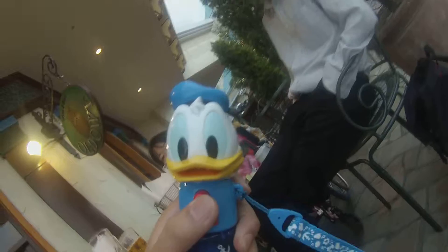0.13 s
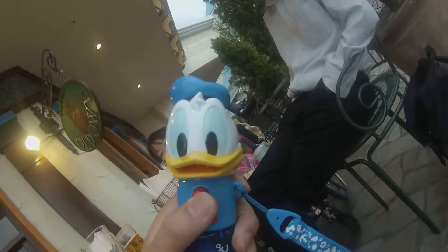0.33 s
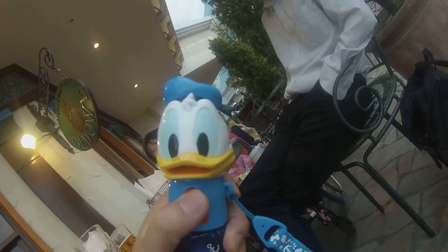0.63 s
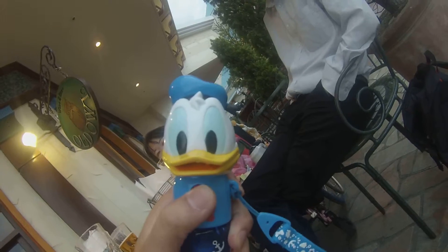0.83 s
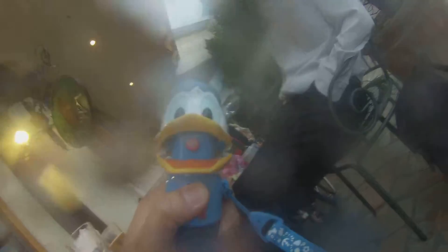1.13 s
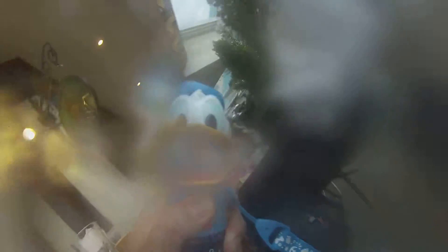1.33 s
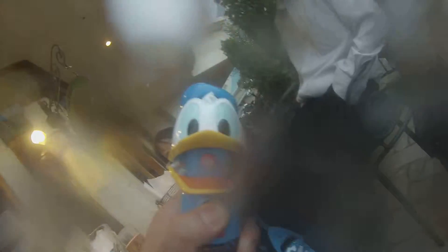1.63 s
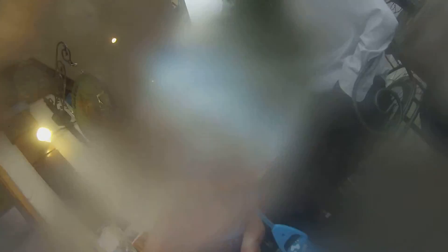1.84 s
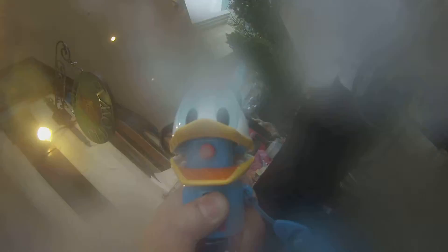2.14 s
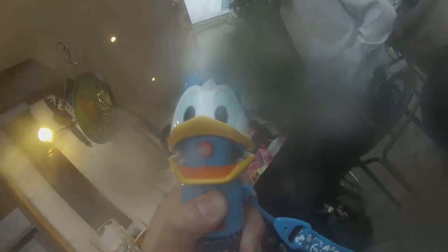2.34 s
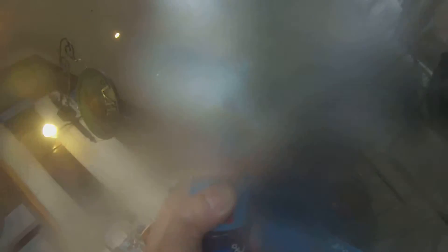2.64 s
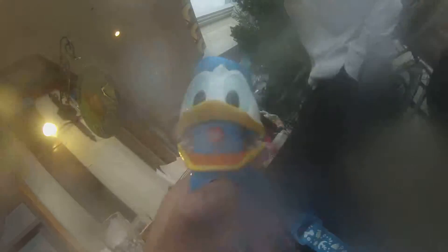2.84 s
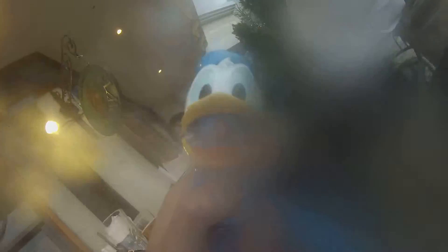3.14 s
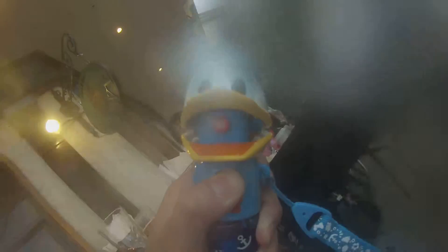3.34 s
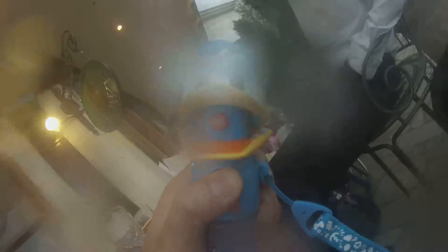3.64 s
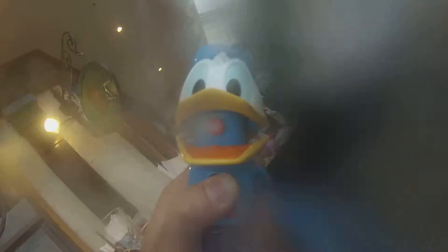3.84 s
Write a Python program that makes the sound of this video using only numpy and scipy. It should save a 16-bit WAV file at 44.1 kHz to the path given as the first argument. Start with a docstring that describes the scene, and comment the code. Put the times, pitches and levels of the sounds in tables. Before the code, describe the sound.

Water jet from a plastic toy spatters loudly on a camera housing after knocks and clicks

```python
"""A hand rubs, pushes and knocks a camera's housing outdoors, then a plastic toy water gun creaks when pressed.
Its valve clicks and a steady jet lands on the camera, brightest while it hits squarely, then an even spatter.
Rubbing, hiss and air are coloured noise; knocks, ticks and large drops are short bursts with dying rings.
The jet is thousands of random tiny impacts a second, which drum, spatter, sizzle and ring on the shell."""
import sys
import numpy as np
from scipy import signal
from scipy.fft import rfft, irfft
from scipy.io import wavfile

SR = 44100
rng = np.random.default_rng(int(sys.argv[2]) if len(sys.argv) > 2 else 0)


def file_out(sig):
    """Save sig as 16-bit WAV at sys.argv[1]."""
    # one column per channel
    cols = np.atleast_2d(sig).T
    # limit, then scale
    lim = np.clip(cols, -1, 1)
    pcm = np.round(lim * 32767).astype(np.int16)
    wavfile.write(sys.argv[1], SR, pcm)


N = 176400  # length in samples: 4 s
TIME = np.arange(N) / SR  # seconds

# Colour tables give relative levels: each sound is brought to a standard strength before its own level.
# Rubbing hand, strength over time [t/s, level/dB] and colour [f/Hz, level/dB]
RUBBING_LEVEL = [(.069, -45), (.075, -41.5), (.11, -43.5), (.16, -41.5), (.177, -27.5), (.186, -41.5),
                 (.192, -55), (.23, -79)]
RUBBING_COLOUR = [(100, -3), (450, -3), (900, -2), (1550, 3.5), (2200, -3), (3650, 0), (4500, -8),
                  (6000, -18), (9000, -17), (12000, -26.5), (15000, -31)]
# Low hum of the pressing hand, strength [t/s, level/dB] and colour [f/Hz, level/dB]
GRIP_HUM_LEVEL = [(.2, -62), (.3, -71), (.55, -62), (.63, -49), (.76, -58), (.85, -67), (.95, -69),
                  (1.1, -80)]
GRIP_HUM_COLOUR = [(40, -12), (110, 3.5), (200, -5), (300, -8), (420, -25), (1000, -47), (4000, -72)]
# Faint outdoor wash, colour [f/Hz, level/dB]
WASH_COLOUR = [(150, -6), (300, -10), (600, -11.5), (1100, -19), (1800, -19), (2600, -25), (3400, -25),
               (4300, -25), (8000, -37.5), (15000, -41)]
# Low rumble of air, strength [t/s, level/dB] and colour [f/Hz, level/dB]
AIR_RUMBLE_LEVEL = [(.06, -60), (.1, -25.5), (.3, -45), (.65, -42.5), (1.0, -48.5), (1.11, -39.5),
                    (1.25, -44.5), (1.35, -41), (1.55, -47.5), (2.0, -49), (2.08, -43), (2.35, -44),
                    (2.55, -49), (4.0, -50)]
AIR_RUMBLE_COLOUR = [(10, 1), (30, 10), (55, -1.5), (85, -7.5), (130, -16), (250, -34.5), (600, -50),
                     (2000, -73.5)]
# Soft pushes of the hand [middle t/s, length/s, peak pressure as signal value]
HAND_PUSHES = [(.0975, 0.005, -0.096), (0.1286, 0.01, 0.22), (0.1495, 0.0029, .22), (.1525, 0.0026, 0.13),
               (.158, .009, -0.11), (.175, 0.036, 0.098), (.197, 0.035, -0.085)]
# Knocks on the housing [t/s, level/dB, ring level/dB, treble corner f/Hz]
HOUSING_KNOCKS = [(.125, 6.5, -14, 4500), (0.1462, -22, -8, 5000), (.1535, 8, -7, 15000),
                  (.1601, 4, 0, 3800), (.1654, -10, -2, 12000)]
# Colour of a knock [f/Hz, level/dB]
KNOCK_COLOUR = [(60, -5), (400, -7.5), (620, -1.5), (900, -4.5), (1450, -1.5), (2150, -10), (3000, -4),
                (3800, -4.5), (4600, -1), (5400, -10.5), (6300, -16), (7900, -6), (8900, -10.5),
                (9800, -10), (11500, -17), (13000, -21), (14200, -33), (15500, -42)]
# Ringing tones of the housing [f/Hz, level/dB, time to fall 60 dB/s]
HOUSING_TONES = [(1516, -24, 0.058), (1680, -22.5, 0.043), (3060, -27, 0.01), (3700, -30, .012),
                 (4600, -25, 0.0092)]
# Stick-slip ticks of the plastic [t/s, level/dB, treble corner f/Hz, f/Hz of the spot that rings]
PLASTIC_TICKS = [(0.2517, -27.5, 2000, 1100), (.2595, -30, 4000, 2200), (0.2846, -15.5, 1700, 1240),
                 (0.3076, -23, 4000, 2400), (0.3522, -20.5, 6000, 2530), (0.3795, -28, 1800, 1900),
                 (0.4001, -22, 6000, 2650), (0.4516, -23, 6000, 2690), (.4975, -26, 3020, 1190),
                 (0.503, -22.5, 4500, 2650), (0.5477, -22, 4030, 2580), (.5755, -24, 1500, 1000),
                 (0.6244, -17, 7000, 3600), (0.6559, -20, 5000, 2950), (0.693, -19, 4500, 2900),
                 (.7265, -19, 5000, 2950), (0.7568, -21.5, 4000, 2300), (0.7892, -22, 3500, 1250),
                 (0.8223, -22, 3500, 1300), (0.8569, -23.5, 2800, 1400), (0.8924, -21.5, 2800, 1400)]
# Colour of a tick [f/Hz, level/dB]
TICK_COLOUR = [(50, 13.5), (130, 13.5), (260, 7.5), (400, -2), (700, 1), (1250, 1), (1650, -2), (2900, -2),
               (4000, -10.5), (5200, -10), (7000, -13), (9000, -18), (15000, -22)]
# Thin hiss, swelling until the jet [t/s, level/dB], and its colour [f/Hz, level/dB]
THIN_HISS_LEVEL = [(.1, -102), (.5, -68.5), (.8, -66), (.85, -67), (.89, -58), (.94, -65), (1.04, -66.5),
                   (1.08, -52.5)]
THIN_HISS_COLOUR = [(300, -15.5), (1100, -3), (1500, 1.5), (2200, -9), (3000, -6), (3400, 2), (3900, -12),
                    (6000, -12), (9000, -16), (15000, -29)]
# Ringing tones of the valve [f/Hz, relative level/dB, time to fall 60 dB/s]
VALVE_TONES = [(1610, -6, .025), (2400, -8, .008), (2950, -4, .016), (3600, 1, .009), (4550, -3, 0.0099),
               (6400, -3, .006), (7300, -16, .006), (12000, -20, .004)]
# Spatter, strength [t/s, level/dB] and colour [f/Hz, level/dB]
SPATTER_LEVEL = [(1.08, -36), (1.097, -32.5), (1.125, -37), (1.19, -33.5), (1.3, -32), (1.5, -34.5),
                 (1.8, -33), (2.05, -32), (2.3, -32.5), (2.8, -33.5), (2.9, -32.5), (3.15, -31.5),
                 (3.45, -32), (3.65, -31.5), (3.85, -34.5), (4.0, -32.5)]
SPATTER_COLOUR = [(300, -31), (800, -15), (1550, -4.5), (2000, -7), (2550, -7), (3100, 0), (3900, -1.5),
                  (4540, 2.5), (5000, -7), (5620, -4), (6400, -9), (7300, -10), (8200, -6), (9050, -3.5),
                  (10000, -13), (11200, -8.5), (12100, -14), (13300, -7.5), (14300, -29), (15200, -19)]
# Bright sizzle where the jet hits squarely, strength [t/s, level/dB] and colour [f/Hz, level/dB]
SIZZLE_LEVEL = [(1.08, -35.5), (1.17, -39), (1.26, -30), (1.34, -27), (1.5, -25), (1.68, -27), (1.87, -29),
                (2.0, -40), (2.25, -40), (2.6, -58), (4.0, -55)]
SIZZLE_COLOUR = [(300, -42), (1200, -8.5), (2300, -7.5), (2900, -8), (3450, -1.5), (3900, -3), (4500, 5.5),
                 (5050, -6), (6500, -8), (7300, -11), (8500, -9.5), (11000, -13.5), (13200, -17),
                 (14300, -29), (15200, -24)]
# Dull drumming of heavier water, strength [t/s, level/dB] and colour [f/Hz, level/dB]
DRUMMING_LEVEL = [(1.08, -38), (1.13, -47), (1.22, -43), (1.35, -39.5), (1.55, -38), (2.0, -38.5),
                  (2.4, -40), (2.8, -38), (3.2, -37), (3.65, -36.5), (4.0, -38.5)]
DRUMMING_COLOUR = [(120, -19), (300, -13), (600, -9), (850, -2), (1200, 0.5), (1800, -4.5), (2300, 2),
                   (2800, -4), (3800, -9), (6000, -19.5), (12000, -45)]
# Two rings of the wet shell, strength of each [t/s, level/dB]
LOWER_RING_LEVEL = [(1.08, -51), (1.2, -45), (1.35, -32), (1.52, -31.5), (1.7, -40), (1.9, -36), (2.2, -54),
                    (2.8, -42), (3.0, -36), (3.4, -43), (4.0, -65)]
HIGHER_RING_LEVEL = [(1.08, -67), (1.45, -37), (1.7, -32.5), (1.9, -34), (2.15, -40), (2.5, -46),
                     (2.8, -48), (4.0, -58)]
# Single large drops [t/s, level/dB, ring level/dB, share of bright spit 0-1]
LARGE_DROPS = [(1.0787, -14, -12, 0), (1.0882, -9, 7, 0.3), (1.0965, -10.5, 0, .1), (1.1175, -9, -22, 0.5),
               (1.317, -6, -5, 0), (1.4915, -3, -11, 0.1), (1.496, -10, 4, .2), (1.6495, -11, -9, 0.4),
               (1.832, -9, -12, .6), (2.458, -11, -15, 0.8), (2.4862, -9, -15, 1), (2.503, -5.5, -25, 1),
               (3.1598, -18, -8, 0.6)]
# Colour of the bright spit [f/Hz, level/dB]
SPIT_COLOUR = [(500, -28), (3000, -21), (6500, -8), (8800, 0), (10500, -9), (13200, -2), (15300, -4)]
# Soft low bumps on the microphone under the jet [middle t/s, length/s, peak pressure as signal value]
JET_BUMPS = [(1.087, .018, -.022), (1.122, .04, .026), (2.486, .022, .018)]

START_S = RUBBING_LEVEL[0][0]  # hand and air are silent before this
WASH_DB = -61
SPOT_DB, SPOT_T60_S = -30, 0.016  # ring of a ticking spot; T60 = time to fall 60 dB
VALVE_S, VALVE_DB = 1.0442, -23
JET_S, JET_RISE_S = 1.077, 0.0035
DROPS_PER_S = 6000  # average, in each layer of water
DROP_SPREAD_DB, DROP_LIMIT = 5, 2.55  # drop size varies; the largest stop at 2.55 spreads
SPOT_SMEAR_S = .0003
LOW_RING_HZ, LOW_RING_WIDTH_HZ = 4637, 210
HIGH_RING_HZ, HIGH_RING_WIDTH_HZ = 5520, 530
FLUTTER_HZ, FLUTTER_DB = 119, 0.47  # fastest wavering of the jet (gentle limit), and its rms depth
DROP_RING_T60_S = 0.01
CEILING = .9  # signal value that rounded peaks approach
CUT_HZ = 15450


def amp(db):
    """Turns decibels into a gain."""
    return 10 ** (np.asarray(db) / 20)


def evened(x):
    """Scales a signal to an rms (average strength) of 1."""
    return x / np.sqrt(np.mean(x ** 2) + 1e-20)


def noise():
    """Steady random hiss with equal strength at all pitches."""
    return rng.standard_normal(N)


def level(points):
    """Gain over time, gliding in dB between the points of a table."""
    return amp(np.interp(TIME, *np.transpose(points)))


def add(mix, s, sound):
    """Lays a sound into the mix at time s."""
    part = mix[max(round(s * SR), 0):][:len(sound)]
    part += sound[:len(part)]


def response(points, corner_hz=SR, size=4096):
    """A short burst of energy 1 with the given colour, dulled above a corner."""
    hz = np.fft.rfftfreq(size, 1 / SR)
    f, db = np.transpose(points)
    gain = amp(np.interp(np.log(hz + 1), np.log(f), db))
    gain /= np.sqrt(1 + (hz / corner_hz) ** 4)
    # Folding the cepstrum puts the energy at the start: a sharp onset with nothing before it
    cepstrum = irfft(np.log(gain + 1e-6))
    cepstrum[1:size // 2] *= 2
    cepstrum[size // 2 + 1:] = 0
    burst = irfft(np.exp(rfft(cepstrum)))
    return burst / np.linalg.norm(burst)


def coloured(x, points, size=4096):
    """Filters a signal to a colour, at rms 1."""
    return evened(signal.oaconvolve(x, response(points, size=size))[:N])


def dulled(x, corner_hz):
    """Gentle one-pole roll-off of the treble."""
    r = np.exp(-2 * np.pi * corner_hz / SR)
    return signal.lfilter([1 - r], [1, -r], x)


def ringing(tones, size=4096):
    """A struck object rings as a sum of sines that each die away."""
    t = TIME[:size]
    return sum(amp(db - 60 * t / t60) * np.sin(2 * np.pi * hz * t) for hz, db, t60 in tones)


def scattered(sound, scatter_db, decay_s, size=2048):
    """Reflections inside a plastic body smear a blow into a short rattle, largely keeping its colour."""
    tail = rng.standard_normal(size) * np.exp(-TIME[:size] / decay_s)
    tail *= amp(scatter_db) / np.linalg.norm(tail)
    tail[0] = 1  # the direct blow
    spectrum = rfft(tail)
    # Halve the spectrum's peaks and dips in dB
    tail = irfft(spectrum / np.sqrt(abs(spectrum) + 1e-9))[:size // 2]
    return signal.fftconvolve(sound, tail / np.linalg.norm(tail))


def pushed(rows):
    """Slow pressure makes smooth one-sided bumps."""
    out = np.zeros(N)
    for s, length, pressure in rows:
        add(out, s - length / 2, pressure * np.hanning(round(length * SR)))
    return out


def rubbing():
    """The hand's friction is coloured noise over the low hum of its grip."""
    rub = coloured(noise(), RUBBING_COLOUR) * level(RUBBING_LEVEL)
    grip = coloured(noise(), GRIP_HUM_COLOUR) * level(GRIP_HUM_LEVEL)
    return (rub + grip) * (TIME > START_S)


def air():
    """Outdoor air is a faint wash of noise and a low rumble at the microphone."""
    wash = amp(WASH_DB) * coloured(noise(), WASH_COLOUR)
    rumble = coloured(noise(), AIR_RUMBLE_COLOUR, size=16384) * level(AIR_RUMBLE_LEVEL)
    return (wash + rumble) * (TIME > START_S)


def knocks():
    """Each knock is a short blow that also sets the housing ringing."""
    out = np.zeros(N)
    for s, db, ring_db, corner_hz in HOUSING_KNOCKS:
        ring = dulled(ringing(HOUSING_TONES), corner_hz)
        blow = response(KNOCK_COLOUR, corner_hz) + amp(ring_db) * ring
        add(out, s, amp(db) * scattered(blow, scatter_db=4, decay_s=0.00059))
    return out


def creaks():
    """Plastic sticks and slips under the thumb, each slip a tick that rings one spot."""
    out = np.zeros(N)
    for s, db, corner_hz, spot_hz in PLASTIC_TICKS:
        tick = response(TICK_COLOUR, corner_hz) + ringing([(spot_hz, SPOT_DB, SPOT_T60_S)])
        # The minus sign starts the tick with a pull instead of a push
        add(out, s, -amp(db) * scattered(tick, scatter_db=-2.5, decay_s=0.0031))
    return out


def thin_hiss():
    """Coloured noise swells unevenly until the jet, then holds its level."""
    return coloured(noise(), THIN_HISS_COLOUR) * level(THIN_HISS_LEVEL)


def valve_click():
    """The valve snaps open and its small parts ring briefly."""
    out = np.zeros(N)
    snap = scattered(ringing(VALVE_TONES), scatter_db=7, decay_s=.0025)
    add(out, VALVE_S, amp(VALVE_DB) * snap / np.linalg.norm(snap))
    return out


def droplets(count=10):
    """Dense impacts of uneven size, each smeared in the way of the spot where it lands."""
    size = amp(DROP_SPREAD_DB * np.minimum(rng.standard_normal(N), DROP_LIMIT))
    lands = rng.random(N) < DROPS_PER_S / SR
    hits = size * rng.choice([-1, 1], N) * lands
    spot = rng.integers(0, count, N)
    out = np.zeros(N)
    for k in range(count):
        smear = scattered(np.ones(1), scatter_db=11.5, decay_s=SPOT_SMEAR_S, size=256)
        out += signal.oaconvolve(hits * (spot == k), smear)[:N]
    return out


def shell_ring(hz, width_hz):
    """Droplets keep one resonance of the wet shell ringing."""
    pole = np.exp((2j * np.pi * hz - np.pi * width_hz) / SR)
    return evened(signal.lfilter([1], [1, -pole], droplets()).real)


def jet():
    """The stream breaks into droplets that drum, spatter, sizzle and ring on the shell."""
    water = coloured(droplets(), SPATTER_COLOUR) * level(SPATTER_LEVEL)
    water += coloured(droplets(), SIZZLE_COLOUR) * level(SIZZLE_LEVEL)
    water += coloured(droplets(), DRUMMING_COLOUR) * level(DRUMMING_LEVEL)
    water += shell_ring(LOW_RING_HZ, LOW_RING_WIDTH_HZ) * level(LOWER_RING_LEVEL)
    water += shell_ring(HIGH_RING_HZ, HIGH_RING_WIDTH_HZ) * level(HIGHER_RING_LEVEL)
    slow_filter = signal.butter(2, FLUTTER_HZ, fs=SR, output="sos")
    flutter = evened(signal.sosfilt(slow_filter, noise()))
    onset = np.clip((TIME - JET_S) / JET_RISE_S, 0, 1)
    return water * amp(FLUTTER_DB * flutter) * onset


def big_drops():
    """A few large drops slap the shell, ring it or burst in a bright spit."""
    out = np.zeros(N)
    slap, spit = response(SPATTER_COLOUR), response(SPIT_COLOUR)
    ring = ringing([(LOW_RING_HZ, 0, DROP_RING_T60_S)])
    ring /= np.linalg.norm(ring)
    for s, db, ring_db, share in LARGE_DROPS:
        drop = (1 - share) * slap + share * spit + amp(ring_db) * ring
        add(out, s, amp(db) * scattered(drop, scatter_db=7, decay_s=0.00084))
    return out


def scene():
    """All sources add up, close to one microphone."""
    hand = rubbing() + pushed(HAND_PUSHES) + knocks()
    toy = creaks() + thin_hiss() + valve_click()
    water = jet() + big_drops() + pushed(JET_BUMPS)
    return (hand + air() + toy + water)[None]


def record(dry):
    """Strong peaks are rounded off softly, then a filter removes the highest treble."""
    rounded = dry / (1 + (dry / CEILING) ** 4) ** .25
    treble_cut = signal.firwin(701, CUT_HZ, window=("kaiser", 8), fs=SR)
    return signal.oaconvolve(rounded, treble_cut[None], "same")


dry = scene()
out = record(dry)
file_out(out)
```